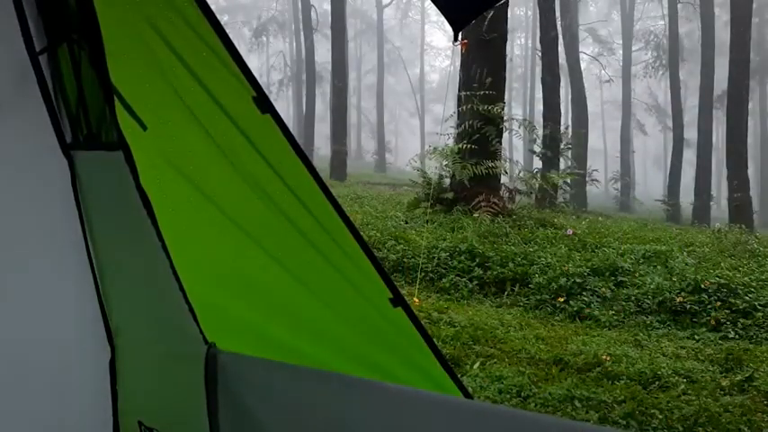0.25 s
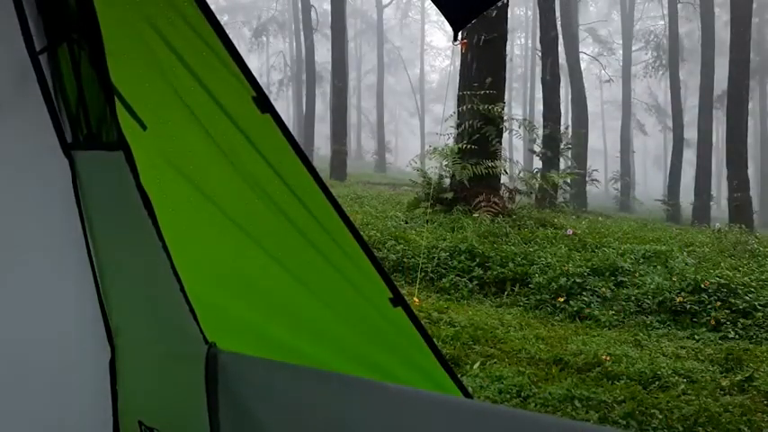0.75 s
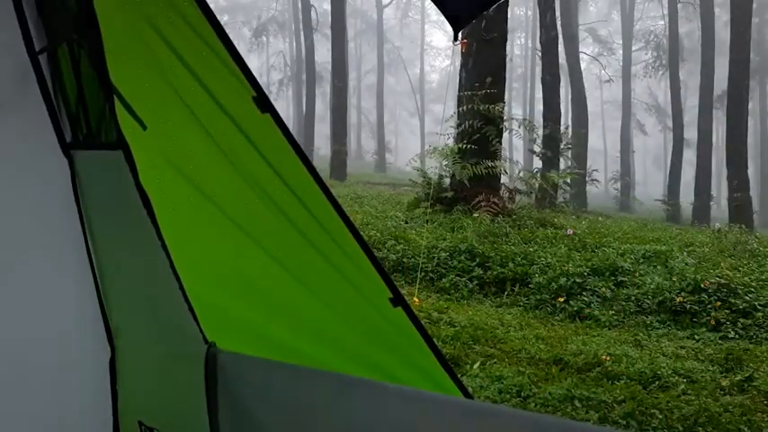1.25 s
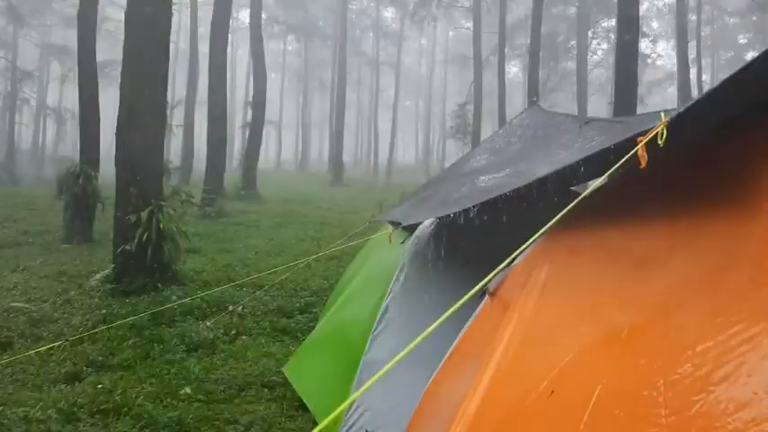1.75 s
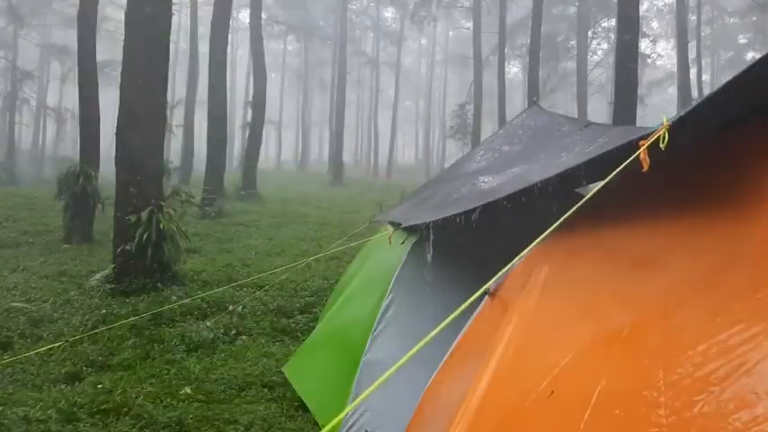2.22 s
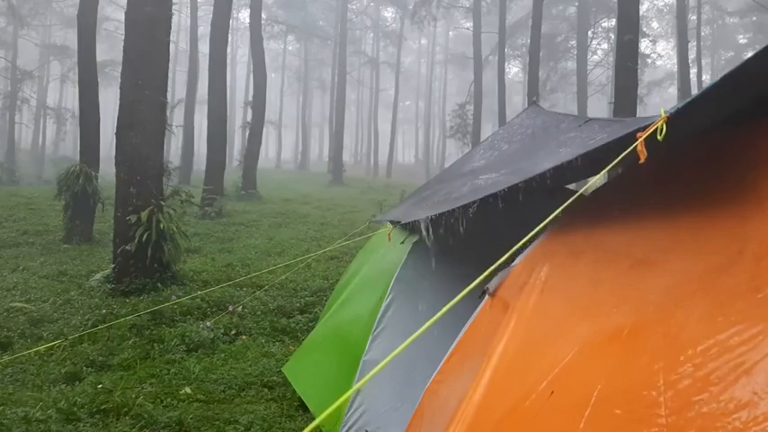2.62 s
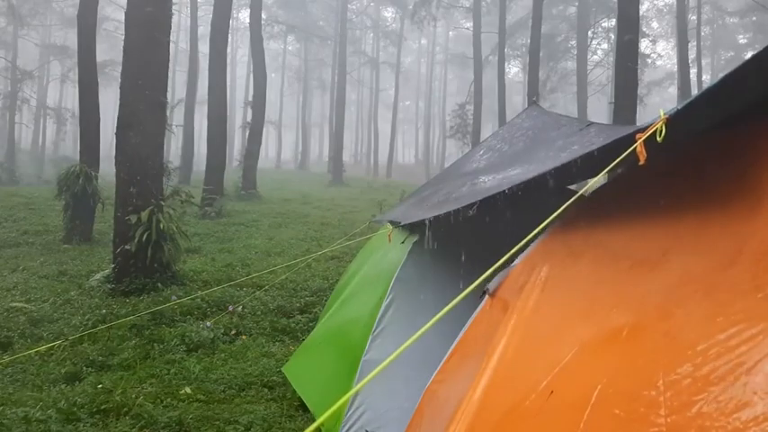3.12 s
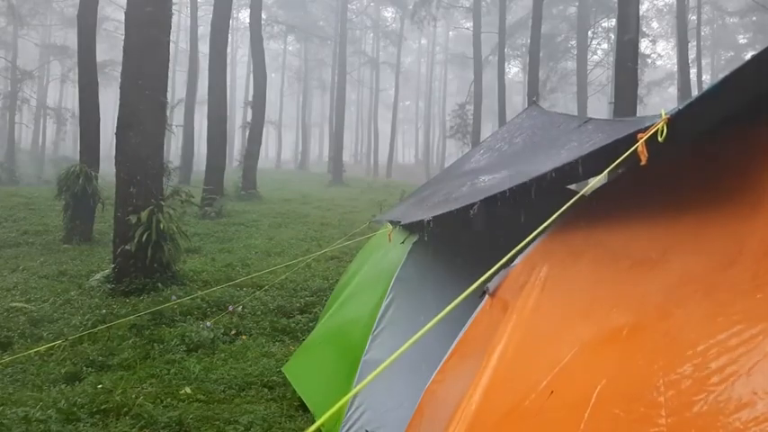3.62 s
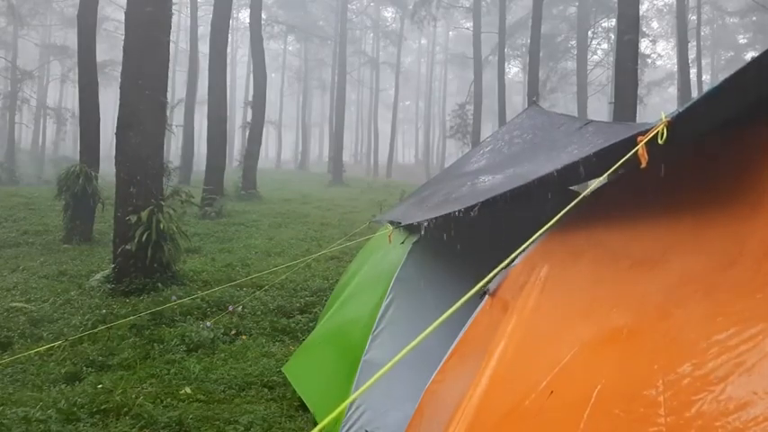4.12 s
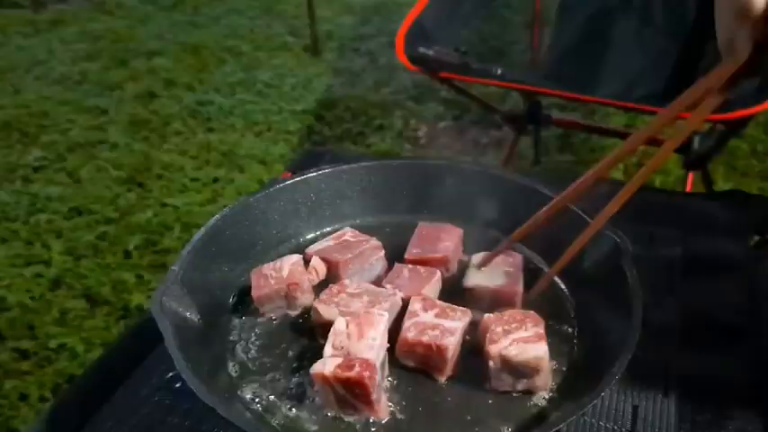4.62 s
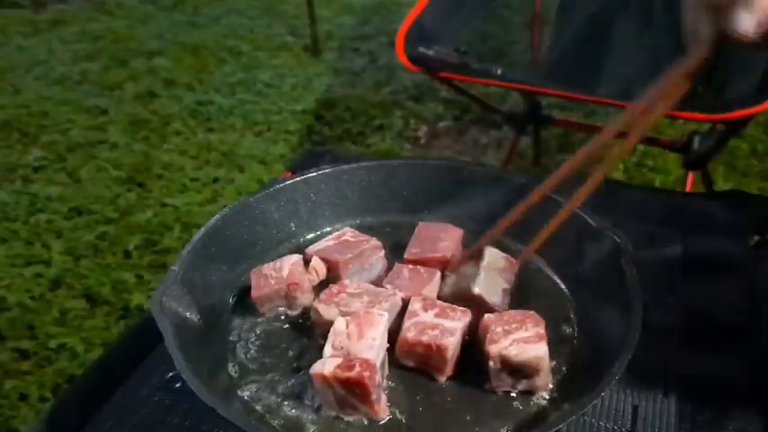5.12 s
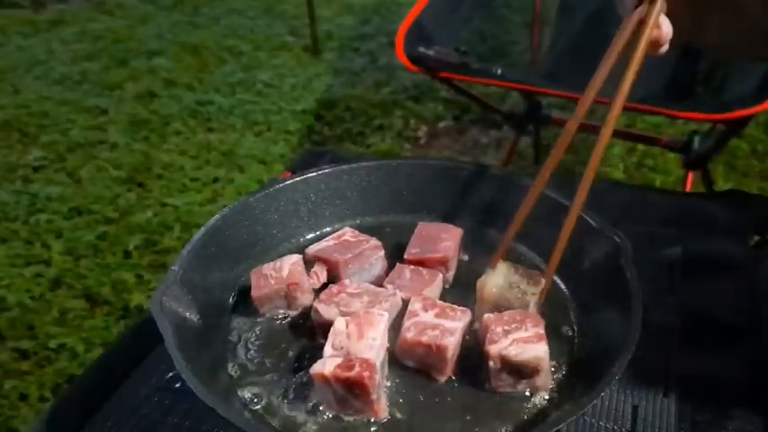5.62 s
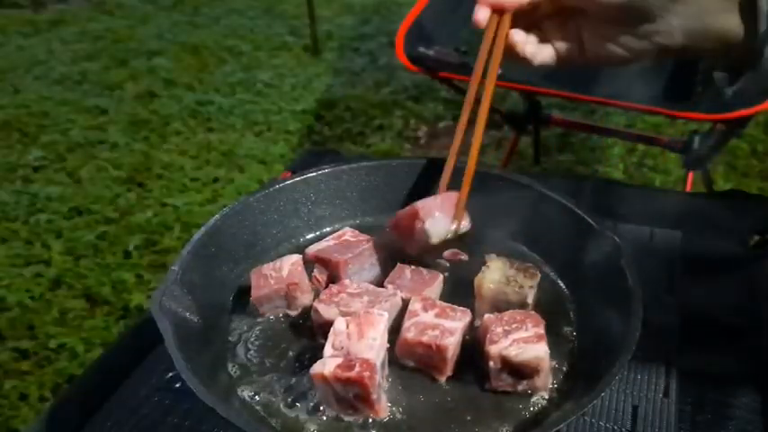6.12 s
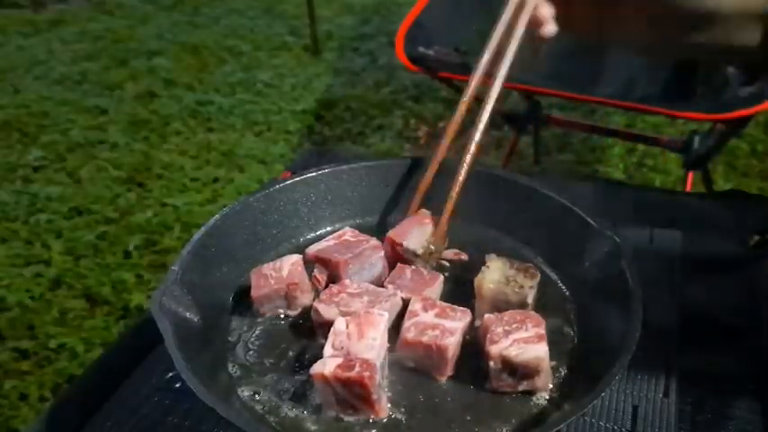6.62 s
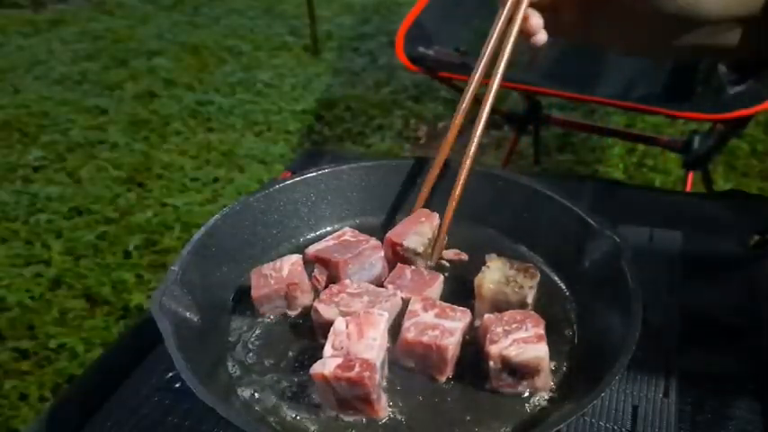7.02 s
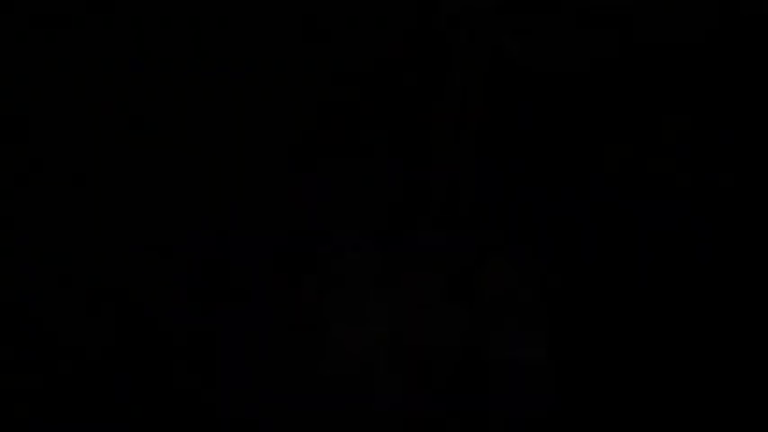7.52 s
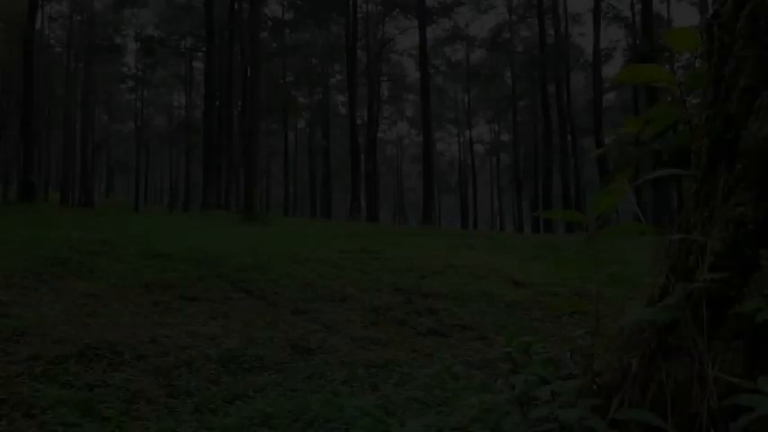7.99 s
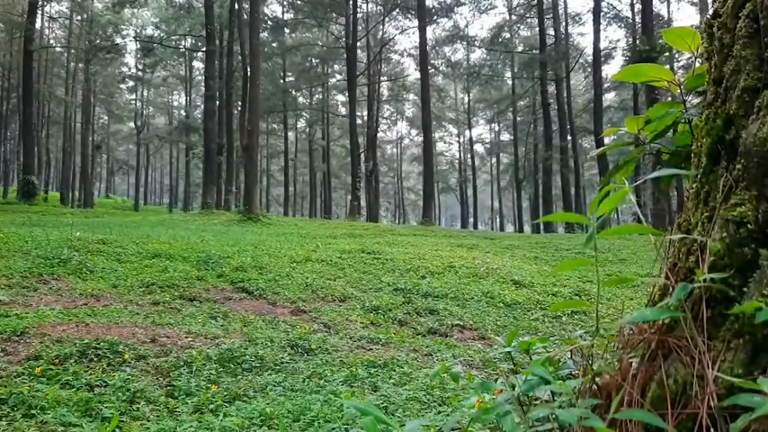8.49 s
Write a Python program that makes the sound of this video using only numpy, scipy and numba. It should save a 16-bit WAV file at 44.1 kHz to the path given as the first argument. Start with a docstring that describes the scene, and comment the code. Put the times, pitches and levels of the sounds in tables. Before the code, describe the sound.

Heavy rain drums on tent fabric, then meat sizzles in a pan under a dripping tarp, fading to silence and faint low woodland wind.

```python
"""Rain and frying in a wet forest

Four places fade one into the next: heavy rain under the tent door, the same rain beside the flysheet, meat
frying under a dripping tarp and, after a silence, the quiet wood in a low wind. Rain, fat and wind are coloured
noise or crowds of tiny taps; big drops ring the modes of taut fabric, knocks and spits ring one resonance each."""
import sys
import numpy as np
from scipy import signal
from scipy.fft import rfft, irfft
from scipy.io import wavfile
from scipy.ndimage import uniform_filter1d
from numba import njit

SR = 44100
rng = np.random.default_rng(int(sys.argv[2]) if len(sys.argv) > 2 else 0)


def to_wav(s):
    """Save 16-bit WAV."""
    ch = np.atleast_2d(s).T  # columns
    pcm = np.round(np.clip(ch, -1, 1) * 32767)  # PCM
    wavfile.write(sys.argv[1], SR, pcm.astype(np.int16))


N = 385875
T = np.arange(N) / SR
HZ = np.arange(N // 2 + 1) * SR / N
RING_SAMPLES = 2048  # length of one big drop, knock or spit


def undb(db):
    """dB to amplitude gain."""
    return 10 ** (np.asarray(db) / 20)


# Each place: start of rise, full, start of fall, silent, in seconds.
AT_DOOR, AT_SHEET = (-1, -.5, 1.17, 1.72), (1.2, 1.66, 4.2, 4.699)
AT_PAN, IN_WOOD = (4.2, 4.7, 7.02, 7.691), (7.762, 8.75, 9, 9.5)


def fade(place):
    """Gain 0-1 of a place: a straight rise, a hold, a straight fall."""
    return np.interp(T, place, [0, 1, 1, 0])


def walk(rate_hz):
    """Random levels held 1 / rate_hz seconds and smoothed twice; spread near 1."""
    hold = int(SR / rate_hz)
    steps = np.repeat(rng.standard_normal(N // hold + 1), hold)
    return 1.3 * uniform_filter1d(uniform_filter1d(steps, hold), hold)[:N]


def late(x, left, right):
    """Each channel delayed by a number of samples."""
    return np.array([np.roll(x[0], left), np.roll(x[1], right)])


def colour(x, table):
    """Causal minimum-phase filter by way of the cepstrum; rms 1 where x sounds."""
    hz, db = np.transpose(table)
    grid_hz = np.maximum(np.arange(2049) * SR / 4096, 1)
    cepstrum = irfft(np.log(undb(np.interp(np.log(grid_hz), np.log(hz), db))))
    # folding the cepstrum forward makes the response causal
    cepstrum[1:2048] *= 2
    cepstrum[2049:] = 0
    response = irfft(np.exp(rfft(cepstrum)))
    y = signal.oaconvolve(x, response[None], axes=1)[:, :N]
    return y / np.sqrt(np.mean(y[:, x[0] != 0] ** 2))


def hiss(lag_ms, alike, gust_hz):
    """Noise from all sides: the ports agree on long waves only, and below gust_hz each feels its own air."""
    shared = np.clip(alike, 0, 1) * np.sinc(2 * HZ * lag_ms / 1000)
    shared = shared * HZ ** 4 / (HZ ** 4 + gust_hz ** 4)
    mid, side = (irfft(rfft(rng.standard_normal(N)) * np.sqrt(1 + sign * shared), N) for sign in (1, -1))
    return np.array([mid + side, mid - side])


def taps(ring_ms, shake, size=1024):
    """A blow, then a decaying noisy shake, one row for each ring time."""
    t = np.arange(size) / SR
    decay = undb(-60 * t / (ring_ms[:, None] / 1000))
    rows = shake * rng.standard_normal((len(ring_ms), size)) * decay
    rows[:, 0] = 1
    return rows


@njit
def scatter(out, at, lag, gain, which, bank):
    """Adds one row of the bank for each drop, shifted by lag samples in opposite directions at the two ports."""
    for k in range(len(at)):
        for j in range(bank.shape[1]):
            out[0, at[k] + lag[k] + j] += gain[k, 0] * bank[which[k], j]
            out[1, at[k] - lag[k] + j] += gain[k, 1] * bank[which[k], j]
    return out


def patter(t0, t1, rate, spread_db, ring_ms, shake, lag_ms, pan_db, size=512):
    """Taps at random moments and places, rate per second; spread_db makes a few much bigger than the rest."""
    when, big, place, pick = rng.random((int(rate * (t1 - t0)), 4)).T
    bank = taps(ring_ms * (.5 + rng.random(64)), shake, size=size)
    side = 2 * place - 1
    big_db = np.minimum(-spread_db * np.log(1 - big), 4 * spread_db)
    gain = undb(big_db[:, None] + pan_db / 2 * side[:, None] * np.array([1, -1]))
    margin = 64  # samples of room for negative lags
    at = ((t0 + when * (t1 - t0)) * SR).astype(np.int64) + margin
    lag = np.round(side * lag_ms * SR / 2000).astype(np.int64)
    out = scatter(np.zeros((2, N + 2048)), at, lag, gain, (pick * 64).astype(np.int64), bank)
    return out[:, margin:N + margin]


# Low rumble spectrum. Each row: frequency in Hz, relative level in dB per Hz.
RUMBLE_SPECTRUM = [(24, -28.5), (45, -17.5), (85, 0), (120, 4.5), (200, -26), (400, -54.5)]
RUMBLE_SHEET_DB, RUMBLE_PAN_DB = -53.5, -66


def rumble():
    """Low coloured noise in lumps, unrelated at the two ports."""
    lumps_db = np.array([6 * walk(9), 6 * walk(9)])
    level = undb(RUMBLE_SHEET_DB) * fade(AT_SHEET) + undb(RUMBLE_PAN_DB) * fade(AT_PAN)
    return level * undb(lumps_db) * colour(rng.standard_normal((2, N)), RUMBLE_SPECTRUM)


# Wind and airy hiss spectra. Each row: frequency in Hz, relative level in dB per Hz.
WIND_SPECTRUM = [(24, -50.5), (40, -30), (86, -7.5), (242, -3), (325, -8), (353, -8.5), (1050, -26),
                 (1500, -38), (2600, -85), (4400, -120)]
AIR_SPECTRUM = [(590, -31), (1000, -16), (1750, -11), (3330, -12), (8060, -18), (9910, -9), (11200, -19),
                (15500, -14.5)]
WIND_DB, AIR_DB = -46, -65.5
WOOD_BEND = 0.89  # exponent below 1: the fade-in rises faster at first
LEFT_LATE_WOOD_SAMPLES = 8


def wood():
    """Low wind in the crowns, fluttering noise, over a faint airy hiss."""
    flutter_db = 1.5 * walk(25)
    wind = undb(WIND_DB + flutter_db) * colour(hiss(0.29, 1.0, 145), WIND_SPECTRUM)
    wind = undb([[-.8], [.8]]) * late(wind, LEFT_LATE_WOOD_SAMPLES, 0)
    air = undb(AIR_DB) * colour(hiss(.3, .3, 150), AIR_SPECTRUM)
    return (wind + air) * fade(IN_WOOD) ** WOOD_BEND


# Door, flysheet and leaf rain spectra. Each row: frequency in Hz, relative level in dB per Hz.
DOOR_SPECTRUM = [(24, -63), (40, -48), (202, -8.5), (317, -17), (509, 0), (686, 1.5), (758, 0),
                 (2060, -4.5), (2390, -10), (3390, -11), (15500, -39)]
SHEET_SPECTRUM = [(24, -73.5), (40, -44.5), (158, -8), (230, -1), (330, -10.5), (522, -2), (760, 1.5),
                  (998, -3), (1500, -6), (2010, -10), (2770, -9), (15500, -33.5)]
LEAVES_SPECTRUM = [(24, -57.5), (40, -44), (162, -8.5), (522, -7), (1520, -5.5), (1770, -7), (2010, -6),
                   (8500, -20), (15500, -24)]
DOOR_DB, SPRAY_DB, DOOR_LEAVES_DB = -15, -23, -20.5
SHEET_DB, SHEET_LEAVES_DB = -21, -20.5
ECHO_MS, ECHO_DB = 2.0, -11  # dulled return from a nearby surface beside the flysheet
LEFT_LATE_DOOR_SAMPLES = 5


def rain():
    """Dense patter and fine spray at the door, lumpier echoing patter on the flysheet, far rain on leaves."""
    door = colour(patter(0, 1.7, rate=1300, spread_db=0.0, ring_ms=9.1, shake=0.24, lag_ms=0.21, pan_db=2.0),
                  DOOR_SPECTRUM)
    spray = colour(patter(0, 1.7, rate=900, spread_db=1.5, ring_ms=2.5, shake=0.61, lag_ms=0.2, pan_db=2,
                          size=128), LEAVES_SPECTRUM)
    sheet = colour(patter(1.1, 4.75, rate=1500, spread_db=1.5, ring_ms=7.3, shake=0.19, lag_ms=0.16,
                          pan_db=5.0), SHEET_SPECTRUM)
    leaves_db = 0.66 * walk(6.9)
    leaves = undb(leaves_db) * colour(hiss(0.116, 0.92, 80), LEAVES_SPECTRUM)

    door = late(undb(DOOR_DB) * door + undb(SPRAY_DB) * spray, LEFT_LATE_DOOR_SAMPLES, 0)
    door = door + undb(DOOR_LEAVES_DB) * leaves
    sheet = undb(SHEET_DB) * sheet + undb(SHEET_LEAVES_DB) * leaves[:, ::-1]
    lag = int(ECHO_MS * SR / 1000)
    sheet = sheet + undb(ECHO_DB) * late(uniform_filter1d(sheet, size=5), lag, lag)
    return (fade(AT_DOOR) * door + fade(AT_SHEET) * sheet) * undb([[.6], [-.6]])


# Brief dips of the background under the sizzle. Each row: middle in seconds, length in seconds, depth in dB.
BACKGROUND_DIPS = [(4.877, 0.059, -4.5), (5.016, 0.02, -5), (5.128, 0.038, -2), (5.265, .03, -2),
                   (5.348, 0.018, -10), (5.616, 0.023, -10), (5.715, 0.024, -3), (5.871, 0.029, -8),
                   (6.063, 0.022, -4.5), (6.148, 0.098, -4.5), (6.274, 0.025, -4), (6.823, 0.037, -6),
                   (6.946, 0.033, -4.5), (7.255, 0.055, -3.5)]


def background_dips():
    """Brief dips in the level of the background under the sizzle, as a gain."""
    return undb(sum(db * np.exp(-(2 * (T - s) / length) ** 4) for s, length, db in BACKGROUND_DIPS))


def patchy(x, depth_db, rate_hz):
    """Each frequency band dips briefly on its own."""
    spectrum, edges_hz = rfft(x), [0, 250, 650, 1100, 1650, 2400, SR]
    out = 0
    for lo, hi in zip(edges_hz, edges_hz[1:]):
        dip_db = depth_db * np.clip(walk(rate_hz), -1.4, 0)
        out = out + undb(dip_db) * irfft(spectrum * (HZ >= lo) * (HZ < hi), N)
    return out


# Tarp and hot fat spectra. Each row: frequency in Hz, relative level in dB per Hz.
TARP_SPECTRUM = [(24, -68), (40, -45), (203, -3), (325, -10.5), (484, -4.5), (774, -7), (961, -7.5),
                 (2050, -6.5), (3000, -8), (3900, -12.5), (6600, -120)]
FAT_SPECTRUM = [(1470, -58), (2500, -12.5), (3470, -6.5), (8810, -5.5), (14500, -3.5), (15500, -2.5)]
# Sizzle as the meat is turned. Each row: time in seconds, gain in dB.
SIZZLE_GAIN = [(4.35, -23), (4.75, -23.5), (5.21, -23.5), (5.37, -22), (6.54, -22), (7.05, -24)]
TARP_DB, FAR_DB = -34, -34


def frying():
    """Steam bubbles burst in the fat as tiny taps and hiss, in surges; drops tap the tarp in flurries."""
    fizz = patter(4.2, 7.75, rate=1700, spread_db=5.0, ring_ms=0.55, shake=0.57, lag_ms=0.022, pan_db=-11, size=96)
    fat = undb(-7.5) * colour(fizz, FAT_SPECTRUM) + colour(hiss(.01, 0.11, 60), FAT_SPECTRUM)
    fat = undb(1.2 * walk(28)) * fat
    # the nearest bubbles surge, bright and alike at both ports
    treble = signal.butter(2, 12500, "highpass", fs=SR, output="sos")
    top = signal.sosfilt(treble, fat[[0, 0]])
    surge_db = 2.5 * walk(24)
    fat = fat + undb(-9.0 + surge_db) * top

    tarp = colour(patter(4.2, 7.75, rate=220, spread_db=3.0, ring_ms=8.6, shake=0.35, lag_ms=0.28, pan_db=19.0),
                  TARP_SPECTRUM)
    far = colour(hiss(0.29, 0.81, 70), TARP_SPECTRUM)
    flurry_db = 2.5 * walk(35)
    background = undb(TARP_DB + flurry_db) * tarp + undb(FAR_DB) * far
    background = background_dips() * patchy(background, depth_db=8, rate_hz=32)
    sizzle = undb(np.interp(T, *np.transpose(SIZZLE_GAIN)))
    return (sizzle * fat + background) * fade(AT_PAN) * undb([[1.1], [-1.1]])


def blows(s, db, rings, shake, shake_ms, low_hz, late_ms, pan_db):
    """Single events: each blow and its shake drive a ring; small thin things shed no bass."""
    out = np.zeros((2, N + RING_SAMPLES))
    thin = signal.butter(3, low_hz, "highpass", fs=SR, output="sos")
    pan_db = pan_db + 0 * s  # left minus right
    for k, row in enumerate(taps(shake_ms + 0 * s, shake)):
        hit = signal.sosfilt(thin, np.convolve(row, rings[k])[:RING_SAMPLES])
        gain = undb(db[k] + np.array([[.5], [-.5]]) * pan_db[k]) / np.abs(hit).max()
        i = min(int((s[k] + late_ms / 1000) * SR), N - 1)
        out[:, i:i + RING_SAMPLES] += gain * hit
    return out[:, :N]


def soft_ring(hz, cycles):
    """A soft-edged push that rings one short resonance."""
    t = np.arange(RING_SAMPLES) / SR
    return np.sin(2 * np.pi * hz * t) * t * np.exp(-hz * t * 2 * np.pi / cycles)


# Soft grainy ticks in the wood. Each row: start in seconds, peak in dB, pitch in Hz.
WOOD_TICKS = [(8.494, -48, 9920), (8.571, -64, 4320)]


def ticks():
    """Short high resonances roughened by a noisy shake."""
    s, db, hz = np.transpose(WOOD_TICKS)
    rings = [soft_ring(f, cycles=7) for f in hz]
    return blows(s, db, rings, shake=.6, shake_ms=14, low_hz=1500, late_ms=.3, pan_db=-4)


# Dull knocks and drips in the wood. Each row: start in seconds, peak in dB, pitch in Hz.
WOOD_KNOCKS = [(7.987, -44, 220), (8.066, -47, 433), (8.068, -57, 1000), (8.431, -36.5, 250),
               (8.494, -55, 1480), (8.681, -34, 147), (8.699, -36, 147), (8.722, -44, 1100),
               (8.725, -57, 2300), (8.731, -51, 1500), (8.724, -33.5, 300), (8.741, -49, 2050)]


def knocks():
    """Heavily damped resonances, low and middling, with a lingering shake."""
    s, db, hz = np.transpose(WOOD_KNOCKS)
    rings = [soft_ring(f, cycles=2.7) for f in hz]
    return blows(s, db, rings, shake=0.22, shake_ms=48, low_hz=90, late_ms=0.57, pan_db=-6)


# Bright spits: one sharp splat in the rain, the rest over the frying.
# Each row: start in seconds, peak in dB, pitch in Hz, left minus right in dB.
BRIGHT_SPITS = [(2.374, -11, 5580, 5), (4.9764, -8, 14100, 6), (5.928, -9, 12400, 0),
                (6.2204, -10.5, 14500, -1), (6.5205, -10.5, 14300, 5), (7.071, -8, 14000, 3.5)]


def spits():
    """Very short, bright resonances without bass."""
    s, db, hz, pan_db = np.transpose(BRIGHT_SPITS)
    rings = [soft_ring(f, cycles=3.9) for f in hz]
    return blows(s, db, rings, shake=0.56, shake_ms=2.8, low_hz=2500, late_ms=0.38, pan_db=pan_db)


# Modes of the taut fabric, before each drop varies them. Each row: frequency in Hz, level in dB, t60 in ms.
FABRIC_MODES = [(550, -0.5, 22.5), (1025, 6, 8.7), (1550, 1, 14), (2000, -1, 5.1), (2520, -1, 4.2),
                (3260, -12.5, 5.4)]
SPLASH_BAND = signal.butter(2, [1100, 2900], "bandpass", fs=SR, output="sos")
SPLASH_T60_S = 0.07


def fabric_ring(hz, fall_db, edge_ms, slack, splash_db):
    """Decaying sheet modes, the one nearest hz tuned to it, others falling off per octave; plus a splash."""
    t = np.arange(RING_SAMPLES) / SR
    modes_hz = np.array(FABRIC_MODES)[:, 0]
    tuned_hz = modes_hz * (1 + slack * rng.standard_normal(len(FABRIC_MODES)))
    tuned_hz[np.argmin(abs(np.log(modes_hz / hz)))] = hz
    spot_db = 1.5 * rng.standard_normal(len(FABRIC_MODES))  # where the drop lands colours the modes
    taut = 1.17 ** rng.standard_normal()  # a tauter spot rings longer
    modes = 0
    for (_, db, t60_ms), f, d in zip(FABRIC_MODES, tuned_hz, spot_db):
        level_db = db + d - fall_db * abs(np.log2(f / hz))
        decay_db = 60 * t * 1000 / t60_ms / taut
        modes = modes + undb(level_db - decay_db) * np.sin(2 * np.pi * f * t)
    splash = signal.sosfilt(SPLASH_BAND, rng.standard_normal(len(t)))
    splash = splash * undb(splash_db - 60 * t / SPLASH_T60_S)
    return (splash - modes) * (1 - np.exp(-t * 1000 / edge_ms))


# The tarp rings broader and splashes louder than the tent.
TENT_FALL_DB_PER_OCTAVE, TENT_SPLASH_DB = 4.5, -12
TARP_FALL_DB_PER_OCTAVE, TARP_SPLASH_DB = 2.5, -6


def thump(s, db, hz):
    """Big drops ringing the fabric: the tent first, the tarp once the pan is fully faded in."""
    rings = []
    for start, f in zip(s, hz):
        on_tarp = start > AT_PAN[1]
        rings.append(fabric_ring(f, fall_db=TARP_FALL_DB_PER_OCTAVE if on_tarp else TENT_FALL_DB_PER_OCTAVE,
                                 edge_ms=0.071, slack=0.065,
                                 splash_db=TARP_SPLASH_DB if on_tarp else TENT_SPLASH_DB))
    pan_db = 2.5 + 1.1 * rng.standard_normal(len(s))
    return blows(s, db, rings, shake=0.058, shake_ms=36, low_hz=437, late_ms=1.289, pan_db=pan_db)


def lesser_thumps(place, top_db, range_db, count):
    """Middling drops at chance moments, landing anywhere between middle and seam."""
    when, small, spot = rng.random((count, 3)).T
    s = place[0] + when * (place[3] - place[0])
    return fade(place) * thump(s, top_db - range_db * small, 480 * 3.6 ** spot)


# The biggest drops on fabric. Each row: start in seconds, peak in dB, strongest pitch in Hz.
BIG_DROPS = [(0.144, -7, 697), (0.161, -8, 700), (0.212, -5, 684), (0.345, -4, 563), (0.385, -16, 511),
             (0.714, -8, 504), (1.04, -6, 579), (1.511, -6.5, 985), (1.611, -2.5, 1010), (1.634, -8, 950),
             (1.665, -2, 484), (1.714, -4.5, 530), (1.749, -4, 953), (1.784, -6, 641), (1.818, -8.5, 1070),
             (1.841, -4, 608), (1.894, -8.5, 956), (1.947, -3.5, 842), (1.977, -0.5, 1090), (2.02, 0, 1070),
             (2.08, -11, 1000), (2.121, -1, 528), (2.187, -3, 1060), (2.247, -6, 1120), (2.298, -9, 716),
             (2.364, -4, 1096), (2.378, -2, 595), (2.444, -3.5, 565), (2.472, -5.5, 1000),
             (2.526, -15, 923), (2.564, -2.5, 600), (2.635, -6, 961), (2.674, -3, 541), (2.713, -3, 918),
             (2.793, -6.5, 528), (2.827, -1, 1030), (2.865, -7, 966), (2.896, -6, 824), (2.927, -5, 894),
             (2.941, -5, 576), (2.982, -7, 891), (3.041, -5.5, 571), (3.139, -4, 1490), (3.315, -4.5, 506),
             (3.336, -7, 1410), (3.351, -3.5, 490), (3.428, -1.5, 538), (3.447, -6, 519), (3.466, -2, 799),
             (3.513, 1.5, 514), (3.55, -10, 551), (3.599, -3, 514), (3.606, -5, 557), (3.624, -6.5, 498),
             (3.668, -7, 536), (3.698, -6, 579), (3.741, -6.5, 501), (3.758, -7, 923), (3.777, -8, 560),
             (3.793, -6, 589), (3.843, -10, 1520), (3.875, -5, 953), (3.928, -3.5, 509), (4.012, -7, 759),
             (4.061, -12, 495), (4.129, -2.5, 1040), (4.168, -7, 503), (4.183, -4, 563), (4.275, -3.5, 495),
             (4.382, -11, 616), (4.516, -13, 541), (4.574, -15, 842), (4.741, -17, 1590),
             (4.928, -14.5, 1040), (4.931, -8.5, 490), (4.942, -16, 568), (4.975, -26, 875),
             (5.048, -21, 1550), (5.072, -24, 530), (5.16, -22, 584), (5.285, -27, 1480), (5.301, -22, 501),
             (5.316, -19.5, 528), (5.42, -23, 589), (5.47, -17.5, 530), (5.503, -26, 748),
             (5.526, -15.5, 517), (5.566, -20, 474), (5.64, -22, 544), (5.654, -8, 498), (5.692, -21, 966),
             (5.75, -22, 530), (5.801, -23, 1680), (5.854, -24.5, 608), (5.901, -23, 506),
             (5.917, -20, 729), (5.976, -19.5, 530), (5.998, -11.5, 1200), (6.024, -17, 1530),
             (6.219, -20, 1490), (6.236, -19.5, 1020), (6.308, -25, 1710), (6.338, -16.5, 1430),
             (6.378, -22.5, 1420), (6.428, -20.5, 517), (6.535, -24, 622), (6.568, -18.5, 533),
             (6.601, -18.5, 1100), (6.641, -26, 493), (6.672, -24.5, 1500), (6.684, -27, 1100),
             (6.719, -23, 554), (6.771, -25.5, 1060), (6.799, -20.5, 544), (6.86, -16, 530),
             (6.885, -16.5, 1600), (6.973, -22, 1070), (7.041, -34, 1110), (7.055, -19, 1070),
             (7.107, -17, 1190), (7.152, -33, 517), (7.207, -30, 762), (7.3, -27, 1200), (7.355, -27, 1070),
             (7.371, -21.5, 969), (7.403, -24, 1580), (7.416, -22, 1540)]


def thumps():
    """Listed big drops and random lesser ones strike the fabric and ring its modes."""
    big = thump(*np.transpose(BIG_DROPS))
    on_sheet = lesser_thumps(AT_SHEET, top_db=-9.5, range_db=3.5, count=60)
    by_pan = background_dips() * lesser_thumps(AT_PAN, top_db=-22.5, range_db=17.0, count=60)
    return big + on_sheet + by_pan


def scene():
    """The four places in turn, with their single drops."""
    background = rumble() + wood() + rain() + frying()
    return background + ticks() + knocks() + spits() + thumps()


TOP_HZ = 15650


def record(dry):
    """The loudest peaks are rounded off and the top is cut."""
    rounded = np.tanh(0.83 * dry) / 0.82
    return signal.sosfilt(signal.ellip(10, .2, 75, TOP_HZ, fs=SR, output="sos"), rounded)


dry = scene()
out = record(dry)
to_wav(out)
```